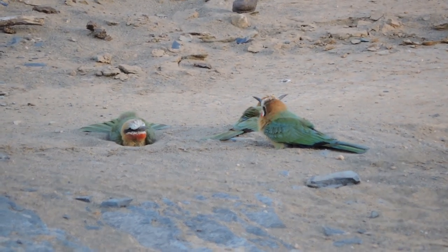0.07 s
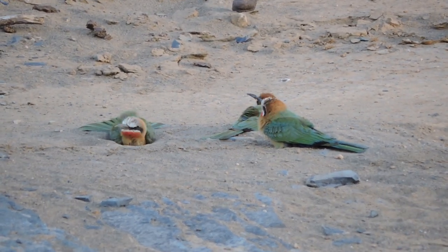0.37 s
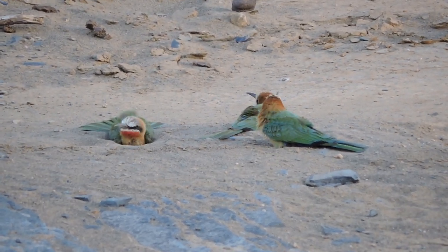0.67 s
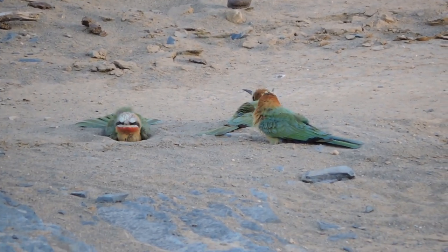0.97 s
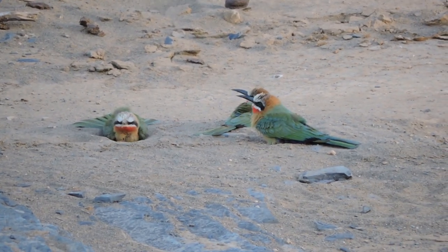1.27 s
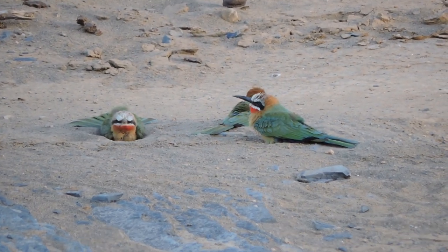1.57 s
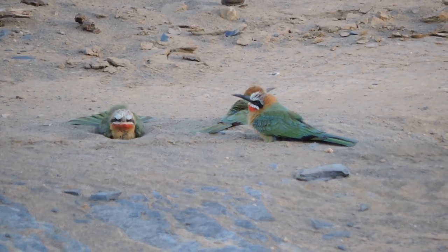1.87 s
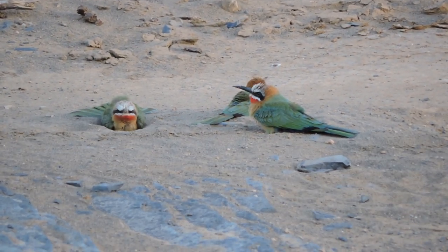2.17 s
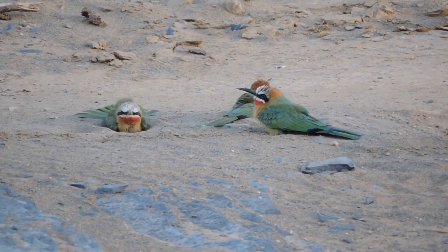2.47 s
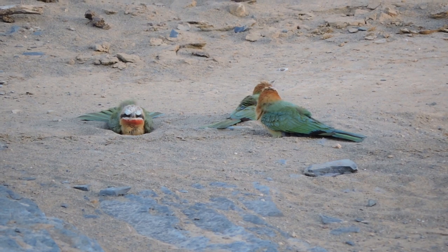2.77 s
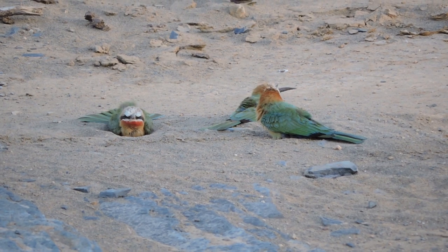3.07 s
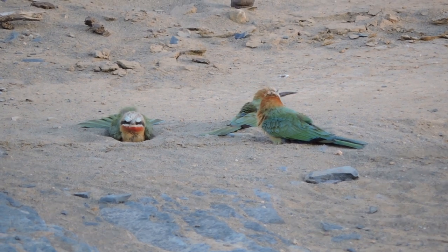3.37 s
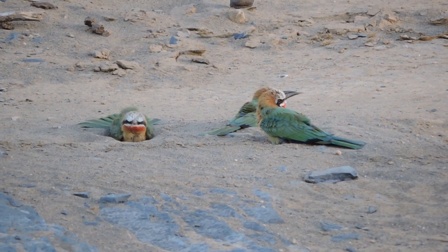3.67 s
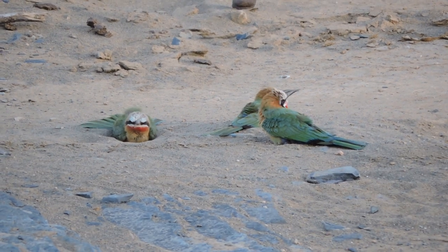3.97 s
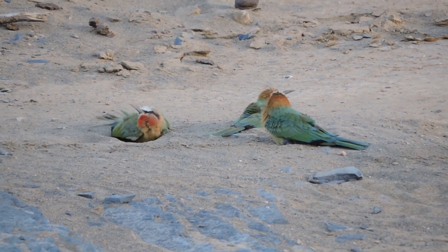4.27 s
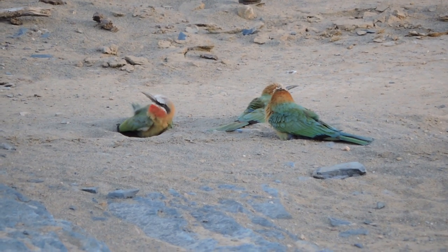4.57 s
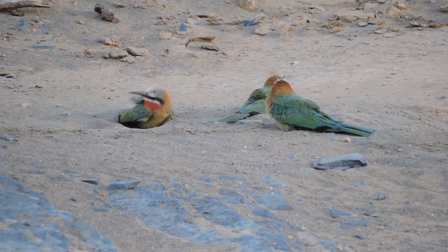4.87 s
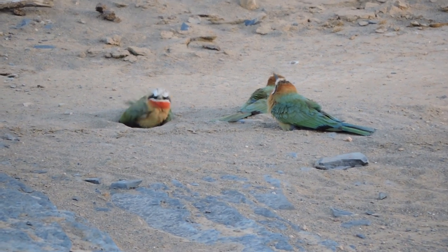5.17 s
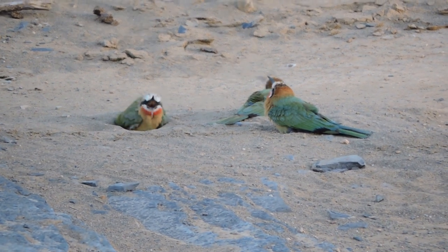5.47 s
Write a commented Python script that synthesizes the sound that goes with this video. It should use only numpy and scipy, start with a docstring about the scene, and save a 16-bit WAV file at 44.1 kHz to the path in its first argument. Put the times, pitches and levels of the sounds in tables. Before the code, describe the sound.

A rising breeze buffets the microphone outdoors with deep, uneven gusts, while a far bird peeps faintly behind a steady hush.

```python
"""A sandy bank outdoors. A breeze rises and tumbles over the two microphone ports of a camera,
far harder on the right one: each port rumbles on its own, brighter as the flow grows, and single
eddies thump across the right. Behind it lie the even wash of distant water or air,
one faint high chitter and two far bird chirps."""
import sys
import numpy as np
from scipy import signal
from scipy.fft import rfft, irfft
from scipy.io import wavfile
from scipy.ndimage import uniform_filter1d

SR = 44100
rng = np.random.default_rng(int(sys.argv[2]) if len(sys.argv) > 2 else 0)


def to_wav(s):
    """Save 16-bit WAV."""
    ch = np.atleast_2d(s).T  # columns
    pcm = np.round(np.clip(ch, -1, 1) * 32767)  # PCM
    wavfile.write(sys.argv[1], SR, pcm.astype(np.int16))


N = 243873
TIME_S = np.arange(N) / SR
FREQ_HZ = np.maximum(np.arange(N // 2 + 1) * SR / N, 1)


def undb(db):
    """Decibels to gain."""
    return 10 ** (np.asarray(db) / 20)


def unit_rms(x):
    """Scale to rms 1."""
    return x / np.sqrt(np.mean(x ** 2))


def over_freq(points):
    """Interpolate (freq_hz, value) rows on a log-frequency axis."""
    hz, value = np.transpose(points)
    return np.interp(np.log(FREQ_HZ), np.log(hz), value)


def noise(gain):
    """Noise of rms 1, shaped by a gain per frequency."""
    return unit_rms(irfft(rfft(rng.standard_normal(N)) * gain, N))


def drift(cutoff_hz):
    """Smooth random motion of rms 1."""
    return noise(np.exp(-(FREQ_HZ / cutoff_hz) ** 2))


def port_rumble(flow_db, top_corner_hz, growth, steepness, low_cut_hz, flutter_db, trim_db=0):
    """Turbulence on one port: falls steeply above a corner that rises with the flow."""
    level_db = flow_db + flutter_db * drift(38)  # eddies come in clumps
    corner_hz = top_corner_hz * undb(growth * (level_db - np.max(flow_db)))
    swirl, total_power = 0, 0
    for hz in 16 * 2 ** (np.arange(14) / 2):  # half-octave bands
        band = noise(np.clip(1 - np.abs(2 * np.log2(FREQ_HZ / hz)), 0, 1) ** .5)
        power = hz / (1 + (hz / corner_hz) ** steepness) / (1 + (low_cut_hz / hz) ** 2)
        swirl += np.sqrt(power) * band
        total_power += power
    swirl /= np.sqrt(total_power)
    # the flow sets the energy that the eddies share at each moment
    energy = uniform_filter1d(uniform_filter1d(swirl ** 2, size=2200), size=2200)
    return swirl / np.sqrt(energy) * undb(level_db + trim_db)


def airflow_db(port, spill_db=-18):
    """Flow at one port: breeze plus bell-shaped gusts, added in power. Gusts spill to the other port."""
    # breeze between gusts: time_s, left_db, right_db
    breeze = [(0, -60, -69), (.55, -67, -65), (1.4, -52, -44), (1.75, -45, -48.5), (2.17, -40.5, -43),
              (2.45, -39, -33.5), (3.3, -36.5, -33.5), (3.65, -41.5, -34), (4.42, -37.5, -30.5),
              (4.76, -45, -45.5), (5.52, -49, -33.5)]
    # gusts: crest_s, half_power_width_s, level_db, struck_port
    gusts = [(1.037, 0.057, -42, "right"), (1.272, 0.046, -54, "left"), (1.526, 0.025, -35.5, "right"),
             (1.743, 0.14, -43.5, "left"), (1.986, 0.039, -33, "right"), (2.038, 0.075, -31.5, "left"),
             (2.22, 0.068, -32.5, "left"), (2.337, .11, -31, "right"), (2.59, 0.2, -31, "right"),
             (2.788, 0.059, -26.5, "right"), (3.018, .15, -24, "right"), (3.266, 0.17, -26, "right"),
             (3.595, .08, -27.5, "right"), (3.733, 0.097, -27, "right"), (3.873, 0.021, -24, "right"),
             (4.044, 0.094, -23.5, "right"), (4.25, 0.11, -23.5, "right"), (4.526, 0.072, -26, "right"),
             (4.67, 0.04, -22, "right"), (4.876, 0.068, -20, "right"), (4.952, 0.06, -22.5, "left"),
             (5.058, 0.055, -20, "right"), (5.172, .1, -26.5, "right"), (5.496, 0.069, -29.5, "right")]
    times_s, left_db, right_db = np.transpose(breeze)
    power = undb(np.interp(TIME_S, times_s, left_db if port == "left" else right_db)) ** 2
    for crest_s, width_s, level_db, struck_port in gusts:
        swell = np.exp(-np.log(2) * (2 * (TIME_S - crest_s) / width_s) ** 2)
        power += swell * undb(level_db + (0 if struck_port == port else spill_db)) ** 2
    return 10 * np.log10(power)


def buffets(width_cycles, wobble_rad, push_hz, push_db, trim_db):
    """Each eddy is a short, uneven pressure swing over a deep push; small ones pass faster, sound higher."""
    # strong eddies: centre_s, level_db, pitch_hz
    eddies = [(2.378, -16.5, 94), (2.583, -15.5, 160), (2.785, -14.5, 153), (2.934, -9.5, 179),
              (2.976, -18, 260), (3.033, -11.5, 242), (3.05, -10, 149), (3.137, -19.5, 242),
              (3.274, -15.5, 115), (3.412, -14, 54.5), (3.762, -16, 205), (4.061, -20.5, 163),
              (4.203, -12.5, 177), (4.289, -12.5, 120), (4.656, -21, 170), (4.868, -15, 253),
              (4.898, -12, 161), (5.052, -14.5, 215), (5.139, -16.5, 110)]
    out = np.zeros(N)
    wobble = wobble_rad * drift(240)
    for centre_s, level_db, pitch_hz in eddies:
        for hz, part_db in ((pitch_hz, 0), (push_hz, push_db)):
            cycles = (TIME_S - centre_s) * hz
            near = np.abs(cycles) < 4
            swing = np.cos(2 * np.pi * (cycles[near] + rng.random()) + wobble[near])
            envelope = np.exp(-(cycles[near] / width_cycles) ** 2)
            out[near] += undb(level_db + part_db + trim_db) * envelope * swing
    return out


def distant_wash(level_db, left_tilt_db):
    """Even rush from all sides: alike at both ports in the bass, opposed where half a wave fits between."""
    # wash spectrum: freq_hz, relative_density_db
    spectrum = [(20, -3.5), (45, -9), (80, -2), (115, -2), (170, 3), (240, 2.5), (325, -3), (600, -1.5),
                (1000, -5), (1550, -8.5), (2500, -14.5), (3600, -22.5), (5200, -29.5), (15800, -40.5)]
    # likeness at the two ports: freq_hz, correlation
    likeness = [(60, 1), (260, 0.96), (550, 0.81), (1050, 0.34), (1600, 0.19), (2400, -0.087),
                (3900, -0.66), (5200, -0.29), (7000, -0.2), (9000, 0.24), (12000, 0.0018)]
    colour = undb(over_freq(spectrum))
    correlation = np.clip(over_freq(likeness), -.99, .99)
    mid = rfft(rng.standard_normal(N)) * colour * np.sqrt(1 + correlation)
    side = rfft(rng.standard_normal(N)) * colour * np.sqrt(1 - correlation)
    tilt = undb(left_tilt_db * np.tanh(np.log(FREQ_HZ / 900)))
    one_sample_delay = np.exp(-2j * np.pi * FREQ_HZ / SR)
    ports = np.array([(mid + side) * tilt * one_sample_delay, mid - side])
    return unit_rms(irfft(ports, N)) * undb(level_db)


def chitter(pitch_hz, rise_s, decay_s, trim_db):
    """A quick run of thin, raspy pips, as from a small bird some way off."""
    # pips: start_s, level_db
    pips = [(0.5454, -63), (0.552, -60), (0.5726, -61), (0.5804, -64), (0.607, -58), (0.6185, -59),
            (0.6334, -61), (0.6509, -64)]
    # pip resonances: pitch_ratio, width_hz, gain_db
    modes = [(.62, 550, 0), (.83, 500, -11), (1, 350, 1.5), (1.09, 500, -4)]
    resonance = sum(undb(gain_db) / (1 + (2 * (FREQ_HZ - ratio * pitch_hz) / width_hz) ** 2)
                    for ratio, width_hz, gain_db in modes)
    out = np.zeros(N)
    for start_s, level_db in pips:
        age_s = np.maximum(TIME_S - start_s, 0)
        envelope = (1 - np.exp(-age_s / rise_s)) * np.exp(-age_s / decay_s)
        out += undb(level_db + trim_db) * envelope * noise(resonance)
    return out


def chirps(width_s, glide, waver):
    """Short peeps of a far bird, blurred on their way."""
    # peeps: centre_s, peak_db, pitch_hz
    peeps = [(1.896, -62, 3370), (2.51, -59, 3330)]
    out = np.zeros(N)
    for centre_s, peak_db, pitch_hz in peeps:
        offset = np.clip((TIME_S - centre_s) / width_s, -5, 5)
        hz = pitch_hz * (1 + glide * offset + waver * drift(351))
        out += undb(peak_db) * np.exp(-offset ** 2) * np.sin(2 * np.pi * np.cumsum(hz) / SR)
    return out


def scene():
    """Independent turbulence on each port, over the shared wash and birds."""
    left = port_rumble(airflow_db("left"), top_corner_hz=80.5, growth=0.15, steepness=6.4,
                       low_cut_hz=26, flutter_db=2.2)
    right = port_rumble(airflow_db("right"), top_corner_hz=134, growth=0.37, steepness=5.72,
                        low_cut_hz=5.2, flutter_db=2.5, trim_db=0.5)
    right += buffets(width_cycles=0.56, wobble_rad=0.27, push_hz=72.5, push_db=-3, trim_db=-0.2)
    birds = chitter(pitch_hz=6940, rise_s=.001, decay_s=0.0078, trim_db=-0.5)
    birds += chirps(width_s=0.0157, glide=.01, waver=0.062)
    return np.array([left, right]) + distant_wash(level_db=-44.5, left_tilt_db=1.03) + birds


def record(dry):
    """The camera sheds the deepest pressure swings and cuts the top; the sound eases in and out."""
    low_cut_hz, top_hz, fade_s = 12, 15700, .004
    highpass = signal.butter(2, low_cut_hz, "highpass", fs=SR, output="sos")
    lowpass = signal.ellip(12, .1, 80, top_hz, fs=SR, output="sos")
    fade = np.minimum(np.minimum(TIME_S, TIME_S[::-1]) / fade_s, 1)
    return signal.sosfilt(lowpass, signal.sosfilt(highpass, dry) * fade)


dry = scene()
out = record(dry)
to_wav(out)
```